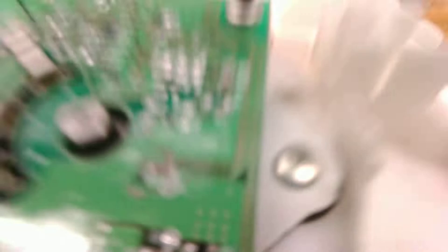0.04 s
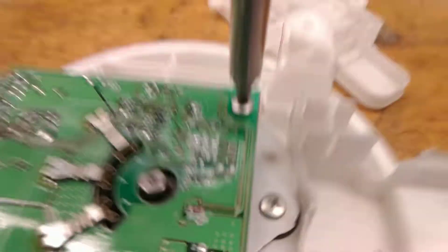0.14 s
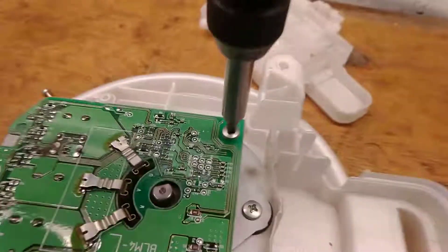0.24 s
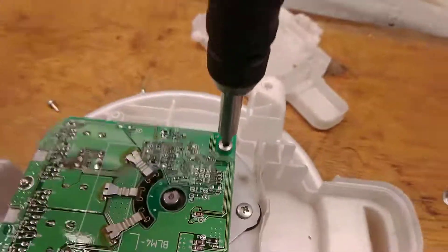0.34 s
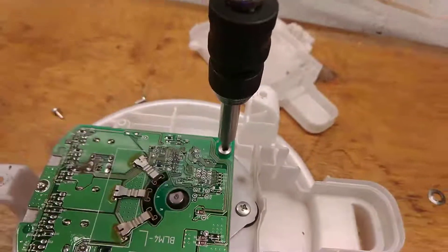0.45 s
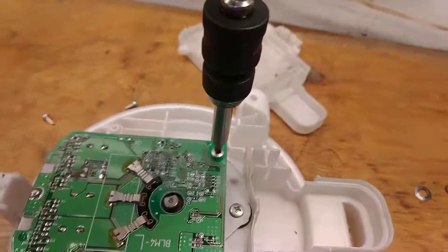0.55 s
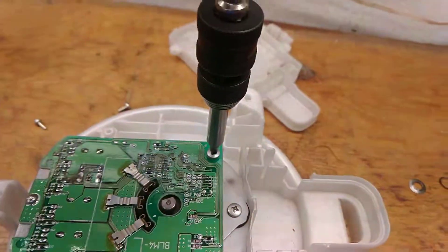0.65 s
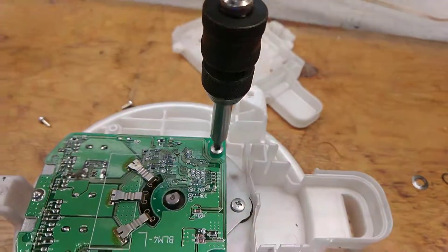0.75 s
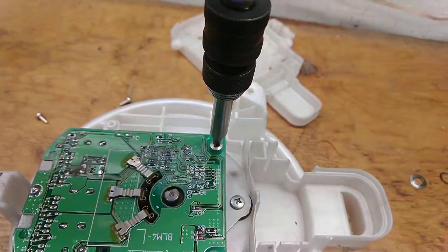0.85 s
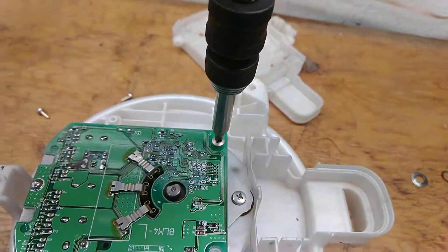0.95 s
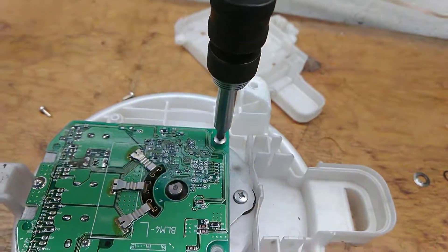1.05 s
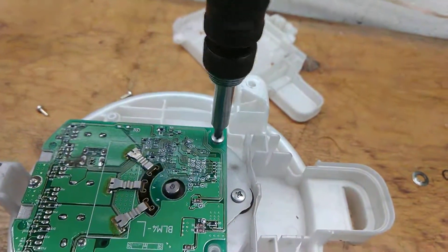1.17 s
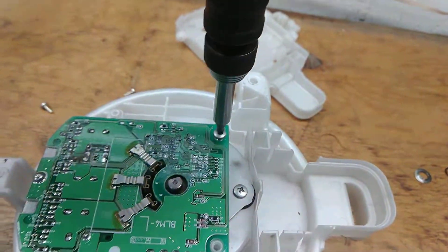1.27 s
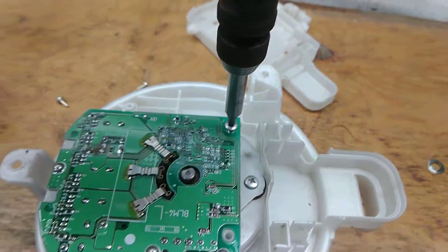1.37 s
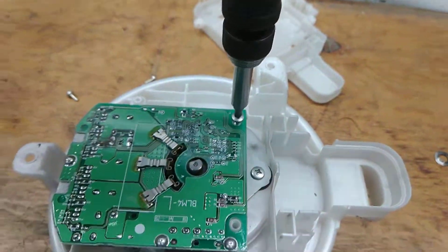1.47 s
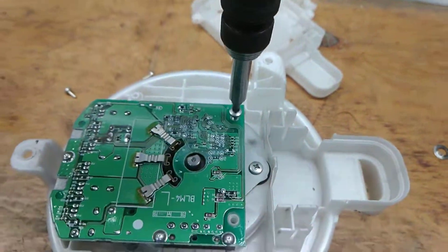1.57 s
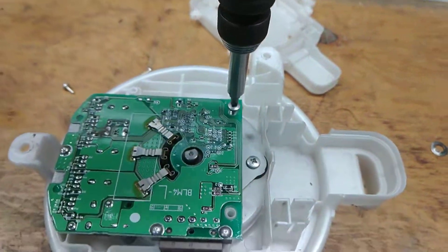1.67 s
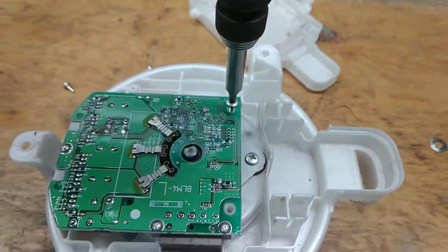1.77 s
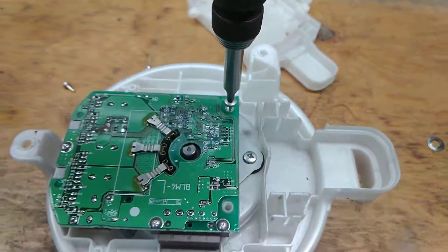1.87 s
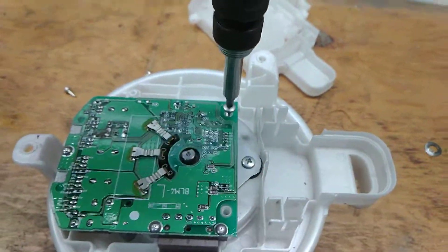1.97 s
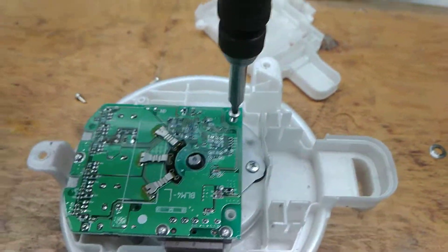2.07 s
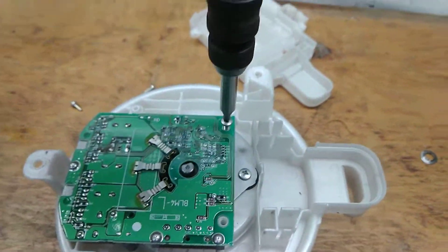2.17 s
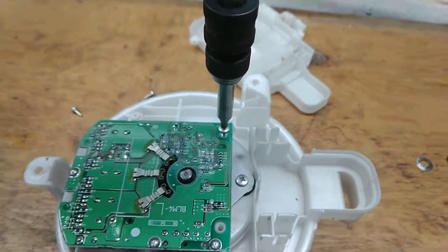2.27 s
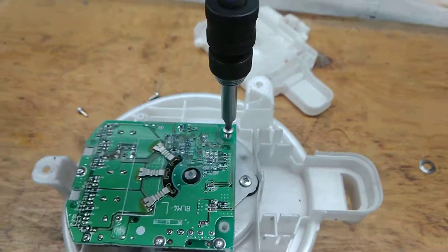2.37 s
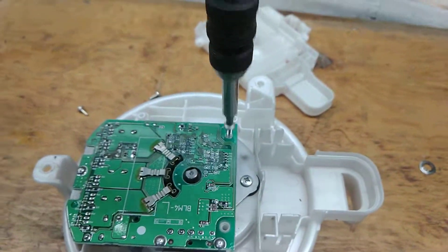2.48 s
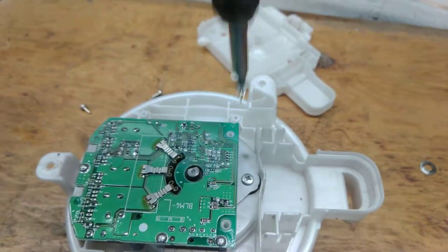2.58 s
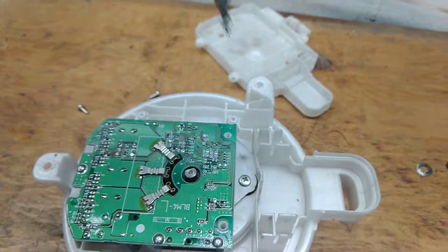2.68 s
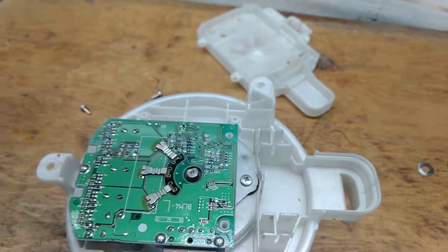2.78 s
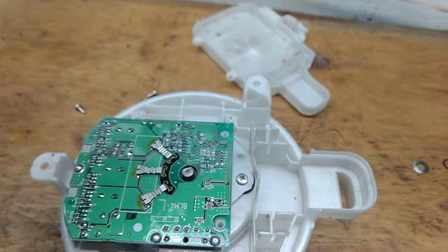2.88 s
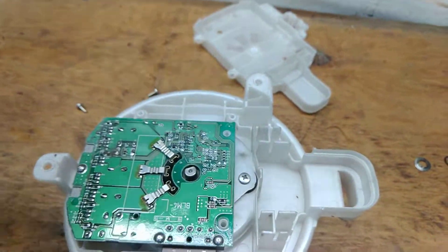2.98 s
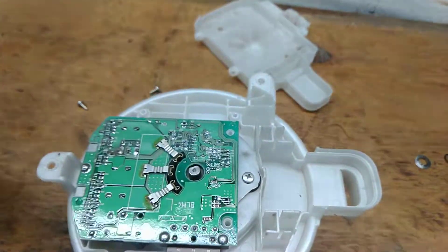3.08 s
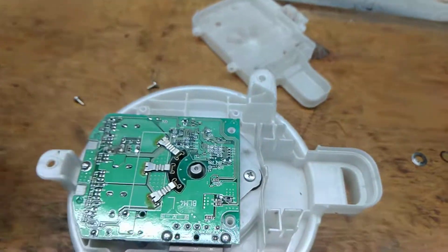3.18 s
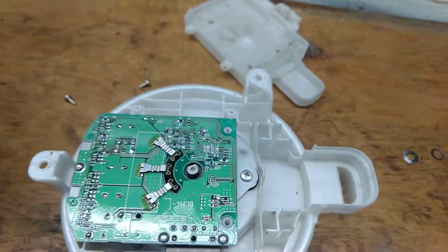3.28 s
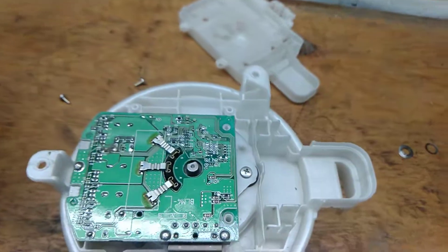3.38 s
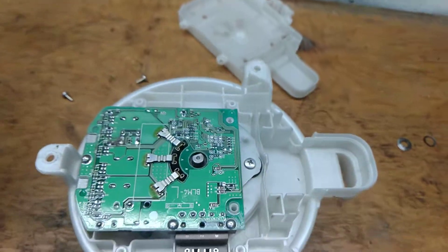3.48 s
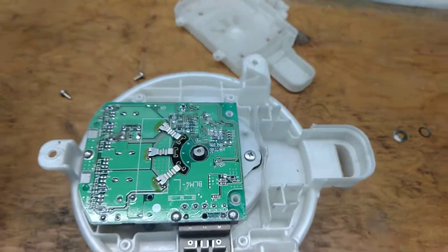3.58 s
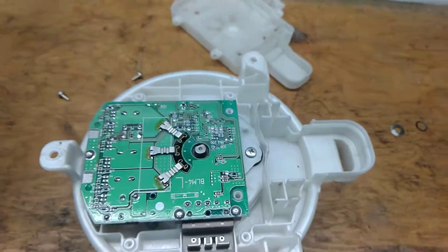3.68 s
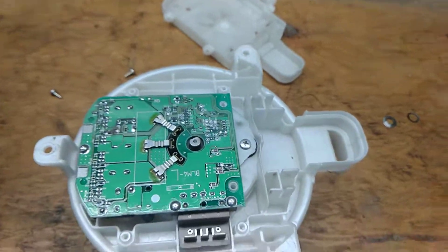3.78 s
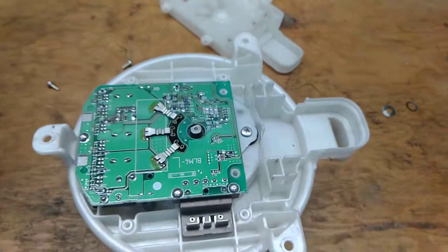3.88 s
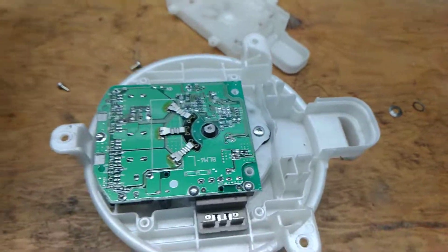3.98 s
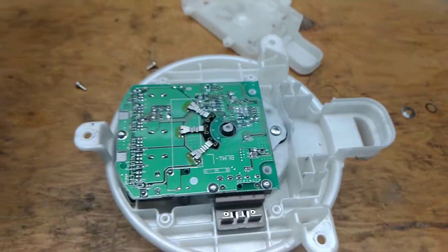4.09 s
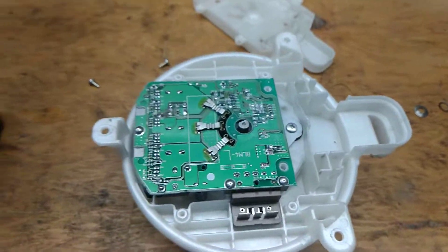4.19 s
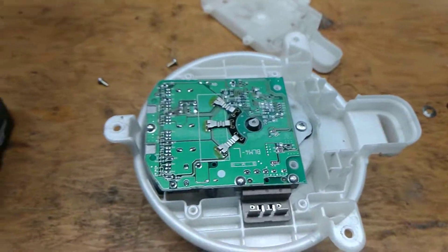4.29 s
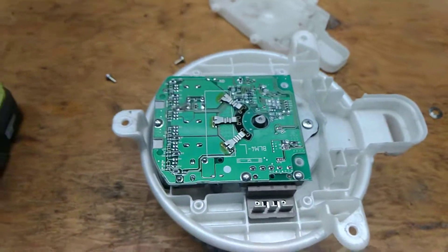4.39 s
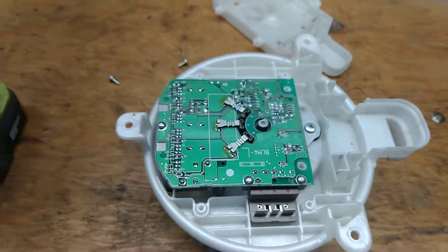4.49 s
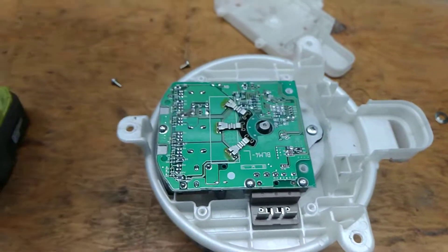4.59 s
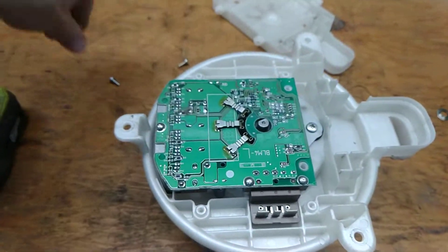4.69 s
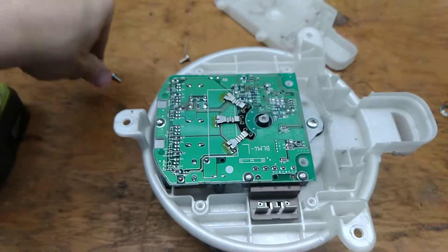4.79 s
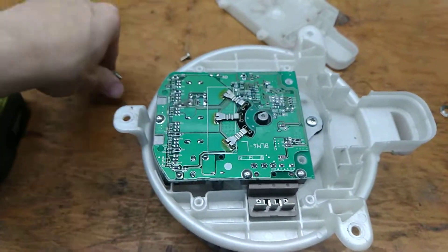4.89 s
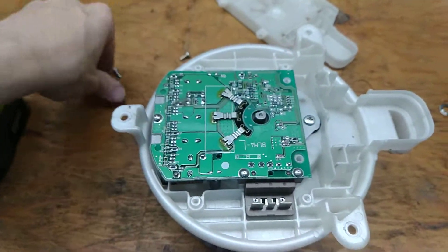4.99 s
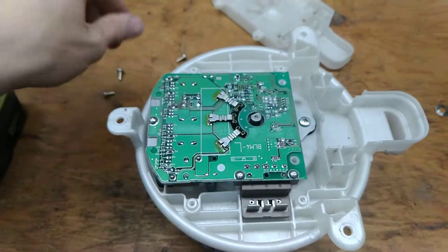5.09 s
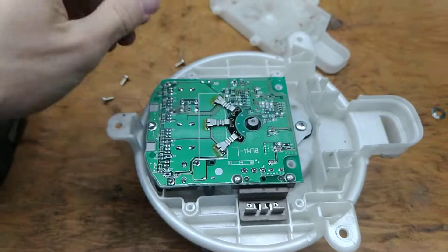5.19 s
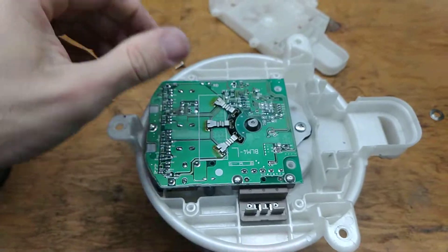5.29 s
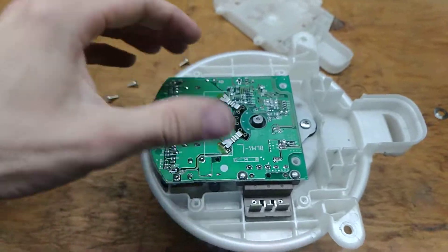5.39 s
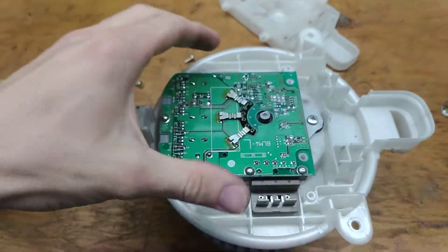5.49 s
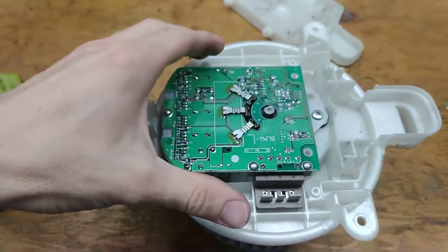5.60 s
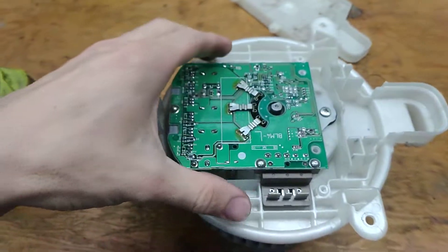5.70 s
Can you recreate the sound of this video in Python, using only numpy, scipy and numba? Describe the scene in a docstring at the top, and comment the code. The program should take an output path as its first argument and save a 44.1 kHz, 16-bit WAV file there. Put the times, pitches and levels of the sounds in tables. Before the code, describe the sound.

Over a faint mains hum in a small workshop, a cordless screwdriver runs for under two seconds, its gritty whir climbing in pitch while the freed screw clacks against a board. The tool then lands on a wooden workbench with a clack and a heavy thud, and knocks once more. Finally a hand shuffles softly, and a small screw scrapes and bounces on the wood. Everything is heard from close by.

```python
"""Unscrewing a circuit board

A cordless driver whines a screw out of a board in a plastic housing; the free thread clacks back once
a turn. The driver clunks down on the wooden bench, then a hand slides a loose screw and drops it.
Mains hum fills the small workshop; a close two-port microphone with gain control ducks the loud hits."""
import sys
import numpy as np
from scipy import signal
from scipy.fft import rfft, irfft, next_fast_len
from scipy.io import wavfile
from scipy.ndimage import map_coordinates
from numba import njit

SR = 44100
rng = np.random.default_rng(int(sys.argv[2]) if len(sys.argv) > 2 else 0)


def file_out(sig):
    """Save sig as 16-bit WAV at sys.argv[1]."""
    # one column per channel
    cols = np.atleast_2d(sig).T
    # limit, then scale
    lim = np.clip(cols, -1, 1)
    pcm = np.round(lim * 32767).astype(np.int16)
    wavfile.write(sys.argv[1], SR, pcm)


N = 253134
T = np.arange(N) / SR
RING_T = T[:SR // 2]  # time axis of one hit

START_S, ATTACK_S, STOP_S, RELEASE_S = 0.96, 0.052, 2.68, 0.18  # one pull of the trigger
# motor speed curve: (t/s, rotation f/Hz)
MOTOR_SPEED = [(1.0, 172.7), (1.02, 163.2), (1.364, 182.6), (1.59, 180.4), (1.834, 187.9), (1.92, 254.4),
               (2.068, 279), (2.29, 284.4), (2.36, 303.8), (2.532, 308), (2.56, 290)]
# surges as the screw binds and the driver labours: (t/s, boost/dB, half length/s)
BINDS = [(1.072, 5, 0.018), (1.164, 3, 0.056), (1.534, 4.5, 0.029), (2.154, 5.5, 0.17)]
# EQ curves of the driver's shell, gears and low rumble: (f/Hz, level/dB)
SHELL_EQ = [(190, -50), (330, -15.5), (625, -8), (720, -3.5), (789, -3), (857, 1), (955, -7.5), (1060, 0),
            (1350, -6), (1500, -6), (2400, -14.5), (3120, -64), (5280, -120)]
GEAR_EQ = [(1410, -54.5), (2400, -23), (2720, -1.5), (3060, -4), (3770, -5), (5040, -7), (6120, -7.5),
           (7330, -7.5), (8110, -9), (9410, -17.5), (10500, -11.5), (11300, -22.5), (12000, -32),
           (13800, -18.5), (15500, -37.5)]
RUMBLE_EQ = [(40, -28), (70, -16.5), (100, -14), (125, 2), (155, -4), (205, -12), (270, -8.5), (400, -22),
             (700, -53)]
def driver(level_db=-43.5, db_per_octave=10, bite_s=0.062, gear_share=.5, sing_hz=858):
    """The rotor's harmonics sing in the shell while the gear rattle pulses once a motor turn."""
    hz = np.interp(T, *np.transpose(MOTOR_SPEED))
    octaves = np.log2(hz / 180)
    turn = 2 * np.pi * np.cumsum(hz * (1 + .007 * walk(70))) / SR
    bind_db = sum(db * np.exp(-((T - s) / length) ** 2) for s, db, length in BINDS)
    effort = amp(level_db + db_per_octave * octaves + gear_share * bind_db)
    pull = np.clip(np.minimum((T - START_S) / ATTACK_S, (STOP_S - T) / RELEASE_S), 0, 1)
    meshing = pull ** 1.9  # the gears fade ahead of the body
    bite = np.sqrt(np.clip((T - START_S) / bite_s, 0, 1))
    load = pull ** 1.15 * bite * amp((1 - gear_share) * bind_db)
    running = (T > .9) & (T < 2.75)
    duty = np.sqrt(running.mean())  # refers rms to the running time
    rotor = np.zeros(N)
    for k in range(2, 46):
        flutter = amp(4.5 * walk(24)[running])
        rotor[running] += flutter * np.cos(k * turn[running] + 2 * np.pi * rng.random())
    teeth = (1 + 0.26 * np.cos(turn)) * amp(1.8 * walk(60) + 0.85 * walk(250))  # teeth bear unevenly
    tone = amp(-0.2) * duty * unit(colour(rotor, SHELL_EQ))
    churn = amp(2.5) * colour(teeth * grit(6000, 2.1), SHELL_EQ)
    # whichever harmonic crosses the shell's main resonance sings out
    sing = amp(-7) * duty * unit(signal.lfilter(*signal.iirpeak(sing_hz, 16, SR), rotor))
    rumble = amp(-1.5 + walk(39)) * colour(rng.standard_normal(N), RUMBLE_EQ)
    hiss = amp(-1) * colour(teeth * grit(14000, 3), GEAR_EQ)
    whine = amp(-9) * duty * unit(colour(rotor, GEAR_EQ))
    # hiss leaves through vents all round the body, so each port hears its own share
    vents = np.array([amp(-4 + db) * colour(teeth * grit(14000, 2), GEAR_EQ) for db in (1.8, -1.8)])
    # speed lifts the gears more than the body
    body = amp(-7 * octaves) * (tone + churn + sing) + amp(-9 * octaves) * rumble
    motor = effort * (meshing * (hiss + whine) + load * body)
    return placed(motor, pan_db=1.73, lag_ms=0.011) + effort * meshing * vents


def controller_whistle(on_s=0.84, off_s=1.9, hz=7230, sag_hz=330, sag_s=.12, idle_db=-69, loaded_db=-58):
    """The speed controller whistles just ahead of the motor; its switching pitch sags under load."""
    load = np.clip((T - START_S) / sag_s + .5, 0, 1)
    phase = 2 * np.pi * np.cumsum(hz - sag_hz * load + 9 * walk(14)) / SR
    gate = np.clip(np.minimum(T - on_s, off_s - T) / ATTACK_S, 0, 1)
    tone = np.sin(phase) + amp(-8) * np.sin(2 * phase)
    return gate * amp(idle_db + (loaded_db - idle_db) * load) * tone


# the free thread dropping back once a turn: (t/s, level/dB)
THREAD_DROPS = [(1.9311, -13), (2.0809, -10.5), (2.228, -10.5), (2.3758, -20)]
# modes of the plastic housing with its board: (f/Hz, level/dB, t60/s)
HOUSING_MODES = [(58, -16, 0.11), (107, -9.5, 0.15), (134, -6, 0.14), (159, 0, 0.052), (236, 3.5, .075),
                 (283, 0, 0.09), (464, -10, 0.069), (581, -13, 0.1), (712, -13.5, 0.087), (921, -13, 0.044),
                 (1134, -11, .07), (1483.4, -12, 0.033), (1665, -16.5, 0.034)]
# EQ of the thread's contact noise: (f/Hz, level/dB)
THREAD_EQ = [(200, -12.5), (600, 9.5), (1500, 0), (2500, 1.5), (3500, -13), (4800, -18), (6800, -19),
             (8300, -31), (11000, -47), (15500, -38.5)]
def thread_clacks(rebound_s=.0082, rebound_db=-5.5, crack_db=-16.5, place=0.11):
    """Each drop of the thread strikes the board, which springs back once."""
    hits = []
    for s, db in THREAD_DROPS:
        for at, level in (s, db), (s + rebound_s, db + rebound_db):
            hits.append((at, level, level, level + crack_db, place))
    return strike(hits, HOUSING_MODES, THREAD_EQ,
                  crack_t60=0.16, tail_db=-25, tail_t60=.08, swell_s=0.0027, place_db=2)


# the driver landing: (t/s, edge/dB, weight/dB, weight delay/s, padding/dB, strike place/0-1)
LANDINGS = [(3.2246, -11.5, -19.5, 0.014, -1, .4), (3.5008, -11, -27.5, 0.0066, 0, .25),
            (3.5572, -15, -6.5, .006, -1, .22), (3.601, -32, -25, .003, 0, .4),
            (3.627, -36, -28.5, 0.0019, 1.5, .4), (3.673, -60, -41.5, .002, 3, 0.2),
            (4.322, -47.5, -36, .002, 9, 0.7), (4.358, -33, -14.5, 0.0044, 3, .36)]
# modes of the wooden bench: (f/Hz, level/dB, t60/s)
BENCH_MODES = [(61.5, -19, .14), (90, -16.5, 0.13), (123, -8.5, 0.095), (164, -1, .11), (215, -3.5, .05),
               (279.2, 3.5, .06), (356, -2, 0.07), (428, 0, 0.04), (521.6, 1, 0.063), (544, -6, .065),
               (739, -0.5, .07), (812, -6.5, 0.054), (994, -7, 0.071), (1120, -8, 0.059),
               (1314, -11.5, 0.055), (1558, -17.5, 0.068), (1775, -22.5, .055), (2065, -23, 0.054)]
# EQ of the bench top's dense, quickly damped ring: (f/Hz, level/dB)
CLUNK_EQ = [(80, -12.5), (250, -0.5), (500, 7), (900, 5.5), (1500, -4), (2500, -4), (3500, -9),
            (4800, -17.5), (6800, -17.5), (8300, -20), (11000, -30.5), (15500, -39)]
def set_down():
    """A bright clack of the edge, then the dull thud of the weight; rubber padding spares only the bass."""
    hits = []
    for s, edge_db, weight_db, delay_s, padding_db, place in LANDINGS:
        edge, weight = edge_db - padding_db, weight_db - padding_db
        hits.append((s, edge_db, edge - 1.04, edge + 2, place))
        hits.append((s + delay_s, weight_db, weight - 11, weight - 13, place))
    return strike(hits, BENCH_MODES, CLUNK_EQ,
                  crack_t60=0.018, tail_db=-17.5, tail_t60=0.21, swell_s=.002, place_db=2)


# the screw landing on head and tip in turn: (t/s, level/dB, strike place/0-1)
BOUNCES = [(4.9596, -34.5, .2), (4.9659, -20.5, 0.05), (5.0208, -32, 0.94), (5.039, -41, 0.6)]
# modes of the screw on the bench top: (f/Hz, level/dB, t60/s)
SCREW_MODES = [(316, -3, .1), (548, -6.5, 0.099), (710, -8.5, 0.067), (994, -9, 0.12), (1090, 1, 0.046),
               (1281, -4, 0.08), (1564, -26.5, 0.043), (1976, -10.5, 0.15), (2630, -9, 0.044),
               (3557, 1.5, 0.042), (3767, 1.5, 0.024), (4620, -11.5, 0.044), (5609, -23.5, 0.045),
               (6300, -9, 0.044), (6860, -11.5, .04)]
# EQ of its contact noise: (f/Hz, level/dB)
SCREW_EQ = [(70, -24), (250, -9), (600, -1), (1200, -0.5), (2400, -7.5), (3600, -1.5), (4900, -7),
            (6600, -13), (8400, -23), (10000, -37.5), (15500, -42)]
def dropped_screw(bass_db=-5, rattle_s=5.049, gap_s=0.014, rattle_db=-37.5, loss_db=3.5):
    """The screw lands, bounces and rattles to rest on chance points of its body."""
    # the crack grows more slowly than the ring
    hits = [(s, db + bass_db, db, -7 + .52 * db, place) for s, db, place in BOUNCES]
    for k in range(4):
        db = rattle_db - k * loss_db
        hits.append((rattle_s + k * gap_s, db + bass_db, db, db + 4, rng.random()))
    return strike(hits, SCREW_MODES, SCREW_EQ,
                  crack_t60=0.023, tail_db=-16.5, tail_t60=0.18, swell_s=0.0018, place_db=-4)


# clicks of bit, screw and chuck: (t/s, crack/dB, ring/dB, t60/s, ring f/Hz)
CLICKS = [(2.4408, -33, -35, .02, 3090), (2.457, -28.5, -22.5, 0.028, 2830),
          (2.6125, -26, -28, 0.025, 3884), (4.3219, -46, -62, 0.037, 3900),
          (4.3572, -27, -33.5, 0.018, 2010), (4.869, -55, -44, 0.05, 3080)]
# spells of handling tool and parts: (start/s, end/s, level/dB)
FIDGET_SPELLS = [(0.496, .81, -63), (4.094, 4.288, -59)]
# EQ of the click transients: (f/Hz, level/dB)
CLICK_EQ = [(300, -4), (1200, -4.5), (2400, 1), (3800, -2), (5000, -5), (6500, -8), (8400, -10),
            (11000, -15.5), (15500, -30.5)]
def clicks(ticks_per_spell=5, scatter_db=2, tick_t60=0.023):
    """Small hard contacts: sharp clicks with a short ring, and faint ticks as parts are handled."""
    cracks, rings = np.zeros(N), np.zeros(N)
    for s, crack_db, ring_db, t60, hz in CLICKS:
        add(cracks, s, amp(crack_db) * fade(t60) * rng.standard_normal(len(RING_T)))
        add(rings, s, amp(ring_db) * fade(t60) * np.sin(2 * np.pi * hz * RING_T))
    for start, end, db in FIDGET_SPELLS:
        for k in range(ticks_per_spell):
            gain = amp(db + scatter_db * rng.standard_normal())
            s = start + (end - start) * (k + rng.random()) / ticks_per_spell
            add(cracks, s, gain * fade(tick_t60) * rng.standard_normal(len(RING_T)))
    return colour(cracks, CLICK_EQ) + rings


# the screw pushed across the wood: (t/s, level/dB, length/s)
PUSHES = [(4.795, -45.5, 0.09)]
# its resonances before the pitch bend: (f/Hz, width/Hz, level/dB)
SLIDE_BANDS = [(520, 220, -4.5), (2124, 310, -5.5), (3060, 380, 1), (4350, 430, 5), (6310, 900, -7.5),
               (8170, 840, -6.5), (10100, 900, -16.5)]
def sliding_screw(sag=.09):
    """Metal catches unevenly on the wood grain; its ring bends down as the finger presses on."""
    catches = grit(4000, 3.8) * amp(3 * walk(110))
    ring = 0
    for hz, width, db in SLIDE_BANDS:
        band = signal.iirpeak(hz, hz / width, SR)
        ring += amp(db) * unit(signal.lfilter(*band, signal.lfilter(*band, catches)))
    pressed = sum(np.clip((T - s) / length, 0, 1) for s, db, length in PUSHES)
    bent = map_coordinates(ring, [np.cumsum(1 + sag * (.7 - pressed))], mode="mirror")
    return strokes(PUSHES) * unit(bent)


# moves of the hand, and of chuck and bit: (t/s, level/dB, length/s)
HAND_MOVES = [(.51, -60.5, .1), (2.875, -58.5, .035), (4.11, -55.5, 0.06), (4.2, -52.5, 0.034),
              (4.79, -50.5, 0.26)]
TOOL_MOVES = [(2.89, -68.5, 0.29)]
def rubs():
    """The hand shuffles dully on the bench; chuck and bit brush lightly past the parts."""
    dull_eq = [(50, -30), (140, 3), (280, -3), (550, -18), (1200, -19), (4000, -46)]
    bright_eq = [(300, -8), (900, -3.5), (1900, -0.5), (2500, -6), (3800, -4), (5200, -12.5),
                 (9000, -17.5), (15000, -27)]
    shuffle = strokes(HAND_MOVES) * colour(grit(1000, 2.9), dull_eq)
    brush = strokes(TOOL_MOVES) * colour(grit(5500, 1.8), bright_eq)
    return shuffle + brush


# mains hum partials: (f/Hz, level/dB)
HUM_PARTIALS = [(59.8, -96), (119.7, -60.5), (479, -82)]
def hum(drone_db=-68):
    """Mains hum over a soft low drone."""
    tones = sum(amp(db + .5 * walk(8.8)) * np.sin(2 * np.pi * hz * T) for hz, db in HUM_PARTIALS)
    drone_eq = [(25, -19.5), (55, -21), (110, -2.5), (170, -10.5), (260, -27), (600, -59)]
    return np.sqrt(2) * tones + amp(drone_db) * colour(rng.standard_normal(N), drone_eq)


# EQ of the workshop's air: (f/Hz, level/dB)
AIR_EQ = [(100, -49.5), (170, -14.5), (190, -13), (253, -9.5), (311, -7.5), (376, -13), (471, -2),
          (637, -7), (930, -9), (1800, -23.5), (2890, -22), (4900, -32), (6140, -32), (15500, -45)]
def air(level_db=-64):
    """A bed of faintly wavering room tone."""
    return amp(level_db + 0.65 * walk(2.7)) * colour(rng.standard_normal(N), AIR_EQ)


# EQ of the early reflections: (f/Hz, level/dB)
EARLY_EQ = [(50, -12.5), (300, 1), (900, -5), (2000, -0.5), (5000, 2.5), (9000, 1), (15000, -2)]
def room(x, early_db=-7, early_t60=0.015, late_db=-16, late_t60=.19, predelay_s=0.002):
    """Quick reflections off bench and housing, then a short tail; different at each port."""
    decays = np.array([fade(early_t60), fade(late_t60)]) * (RING_T > predelay_s)
    out = []
    for port in range(2):
        early, late = rng.standard_normal(decays.shape) * decays
        slap = amp(early_db) * colour(early / np.linalg.norm(early), EARLY_EQ)
        tail = amp(late_db) * late / np.linalg.norm(late)
        out.append(signal.fftconvolve(x, slap + tail)[:N])
    return np.array(out)


# microphone ports, left against right: (f/Hz, level/dB) and (f/Hz, phase lead/rad)
PORT_BALANCE = [(60, 10.5), (130, 9.5), (250, 1.5), (380, 9), (560, 3.5), (800, 2), (1300, 0.5), (2400, 0),
                (4400, -0.5), (7500, 7.5), (15000, -2.5)]
PORT_LEAD = [(0, -2.2), (290, -1.5), (560, -.5), (800, -.9), (1300, .7), (2400, -3), (16000, -37.9)]
def ports(x, pan_db=0, lag_ms=0):
    """Stereo image: the two ports differ in level and phase, offset by the source's pan and lag."""
    size = next_fast_len(N + SR // 10)
    hz = np.fft.rfftfreq(size, 1 / SR)
    lead = np.interp(hz, *np.transpose(PORT_LEAD)) - 2 * np.pi * hz * lag_ms / 1000
    left = amp((on_log(PORT_BALANCE, hz) + pan_db) / 2) * np.exp(.5j * lead)
    return irfft(rfft(x, size) * np.array([left, 1 / left]), size)[:, :N]


def placed(x, pan_db, lag_ms):
    """A source at its own spot on the bench, with its own reflections."""
    return ports(x, pan_db, lag_ms) + room(x)


def strike(hits, modes, crack_eq, crack_t60, tail_db, tail_t60, swell_s, place_db):
    """Each hit (t/s, bass/dB, mids/dB, crack/dB, strike place/0-1) rings a body's modes and cracks."""
    ring, cracks = np.zeros(N), np.zeros(N)
    crack_decay = fade(crack_t60) + amp(tail_db) * fade(tail_t60)
    for s, bass_db, mids_db, crack_db, place in hits:
        for k, (hz, db, t60) in enumerate(modes):
            force_db = on_log([(260, bass_db), (560, mids_db)], hz)
            shape_db = place_db * np.cos(np.pi * k * place)  # nodes and bellies of the mode
            gain = (-1) ** k * amp(db + force_db + shape_db)
            swell = 1 - np.exp(-RING_T * hz / (swell_s * 200))  # low modes take longer to build
            add(ring, s, gain * swell * fade(t60) * np.sin(2 * np.pi * hz * RING_T))
        add(cracks, s, amp(crack_db) * crack_decay * rng.standard_normal(len(RING_T)))
    return ring + colour(cracks, crack_eq)


def strokes(moves):
    """Envelope of short rubs that start quickly and ease off."""
    return sum(amp(db) * np.interp((T - s) / length, [0, .1, .7, 1.1], [0.0079, 0.98, 0.7, 0])
               for s, db, length in moves)


def grit(rate, spread_db):
    """Dense tiny clicks of very unequal size."""
    grains = (rng.random(N) < rate / SR) * rng.standard_normal(N)
    return unit(grains * amp(spread_db * np.minimum(rng.exponential(size=N), 4)))


def walk(rate):
    """Smooth random drift, spread near 1."""
    step = max(int(SR / rate), 2)
    count = N // step + 2
    return np.interp(T, np.arange(count) * step / SR, rng.standard_normal(count))


def colour(x, eq, size=4096):
    """Minimum-phase EQ along an (f/Hz, level/dB) curve, at unit power gain."""
    cepstrum = irfft(np.log(amp(on_log(eq, np.fft.rfftfreq(size, 1 / SR)))))
    cepstrum[1:size // 2] *= 2
    cepstrum[size // 2 + 1:] = 0
    response = irfft(np.exp(rfft(cepstrum)))
    return signal.fftconvolve(x, response / np.linalg.norm(response))[:len(x)]


def on_log(points, hz):
    """Read (f/Hz, value) points on a log-frequency axis."""
    f, value = np.transpose(points)
    return np.interp(np.log(np.maximum(hz, 1)), np.log(np.maximum(f, 1)), value)


def amp(db):
    """Decibels to gain."""
    return 10 ** (np.asarray(db) / 20)


def unit(x):
    """Scale to rms 1."""
    return x / np.sqrt(np.mean(x ** 2))


def fade(t60):
    """Exponential decay."""
    return np.exp(-np.log(1000) * RING_T / t60)


def add(out, s, x):
    """Mix x into out from time s."""
    i = int(s * SR)
    out[i:i + len(x)] += x[:N - i]


@njit
def follow(x, attack, release):
    """Envelope follower with separate rise and fall rates."""
    out, level = np.empty(len(x)), 0.
    for i in range(len(x)):
        level += (x[i] - level) * (attack if x[i] > level else release)
        out[i] = level
    return out


def scene():
    """The stereo mix: driver up front, bench and hand foley around it, workshop ambience beneath."""
    clacks, clunks, bounces = thread_clacks(), set_down(), dropped_screw()
    work = driver() + ports(clacks + controller_whistle(), pan_db=-0.5)
    bench = placed(clunks + clicks(), pan_db=2.5, lag_ms=-.01)
    hand = placed(bounces + sliding_screw() + rubs(), pan_db=0, lag_ms=0.016)
    ambience = ports(hum() + amp(-1.5) * air(), pan_db=2.5)
    wide_air = amp(-5) * np.array([air(), air()])
    return work + bench + hand + ambience + wide_air


def record(dry, knee_db=-17, attack_s=0.011, release_s=0.37, squeeze=0.41, low_hz=48, top_hz=15600):
    """Low cut, gain control that ducks after loud knocks, peak clip, then a steep high cut."""
    dry = signal.sosfilt(signal.butter(2, low_hz, "high", fs=SR, output="sos"), dry)
    envelope = follow(np.abs(dry).max(0), 1 / (attack_s * SR), 1 / (release_s * SR))
    gain = np.maximum(envelope / amp(knee_db), 1) ** -squeeze
    high_cut = signal.ellip(8, .2, 70, top_hz, fs=SR, output="sos")
    return signal.sosfilt(high_cut, np.clip(dry * gain, -1, 1))


dry = scene()
out = record(dry)
file_out(out)
```